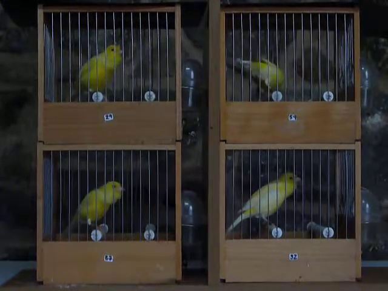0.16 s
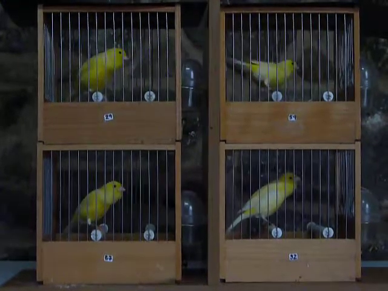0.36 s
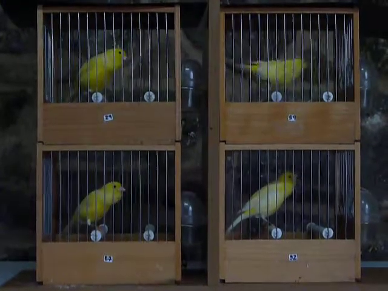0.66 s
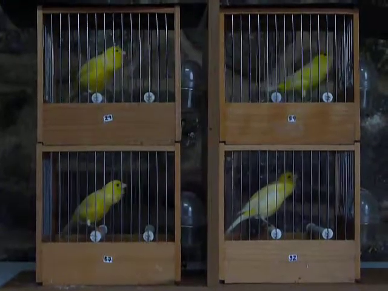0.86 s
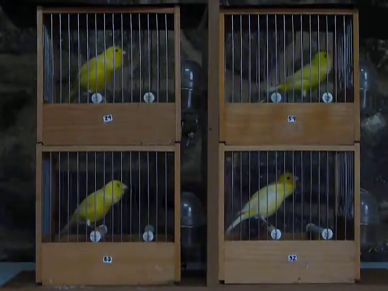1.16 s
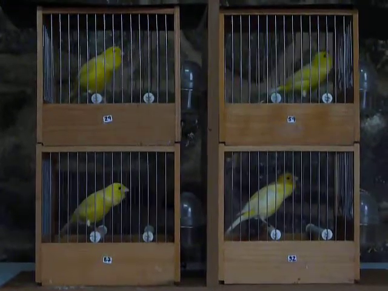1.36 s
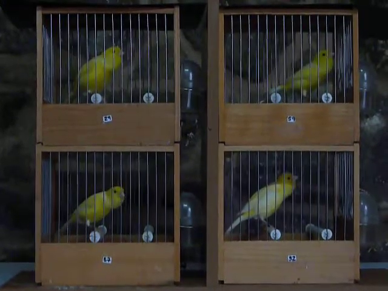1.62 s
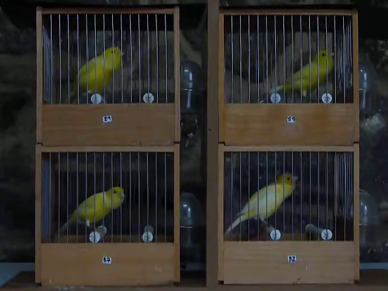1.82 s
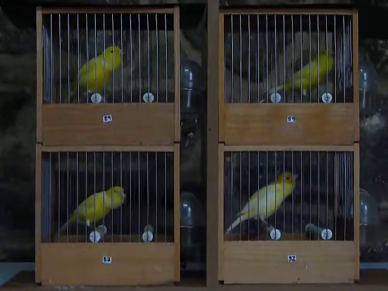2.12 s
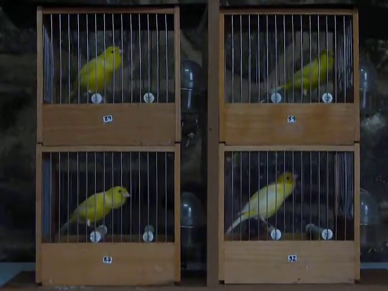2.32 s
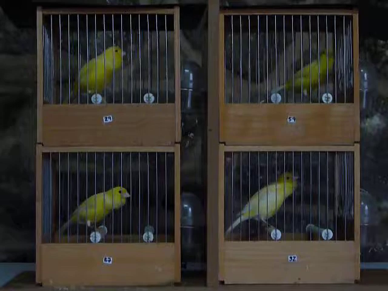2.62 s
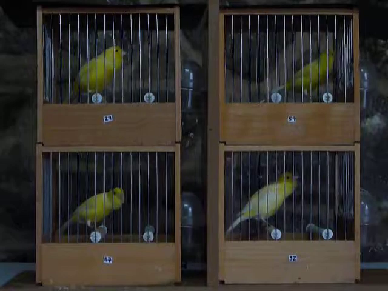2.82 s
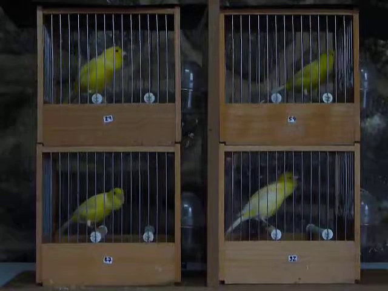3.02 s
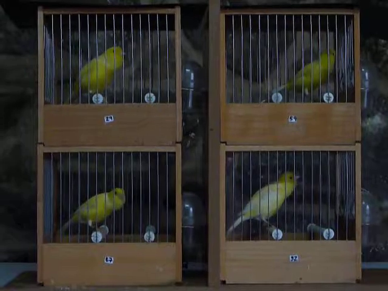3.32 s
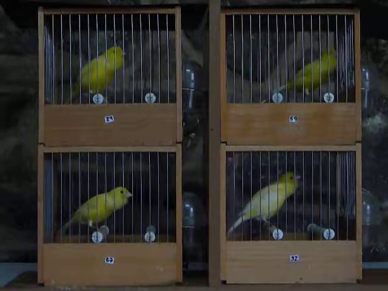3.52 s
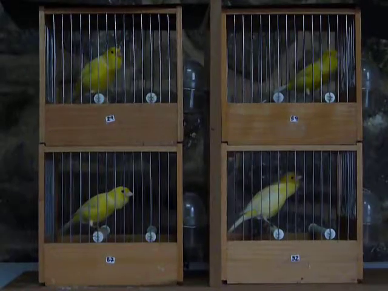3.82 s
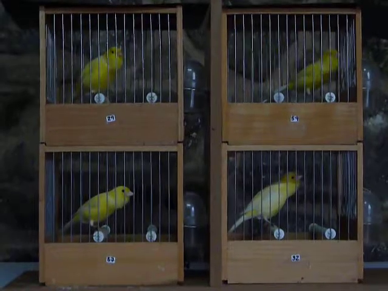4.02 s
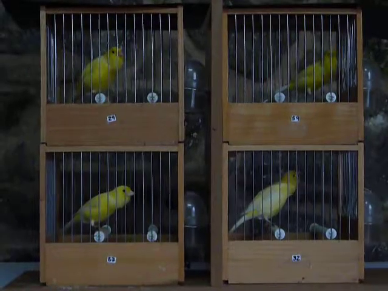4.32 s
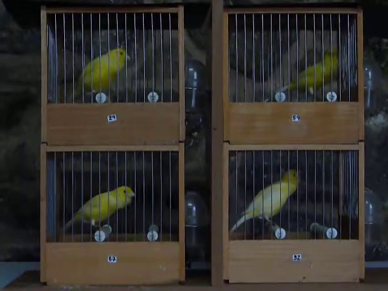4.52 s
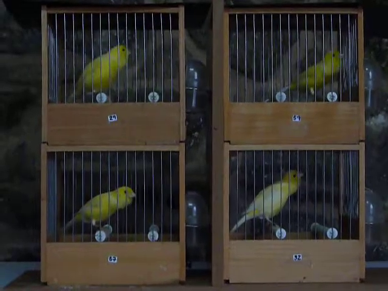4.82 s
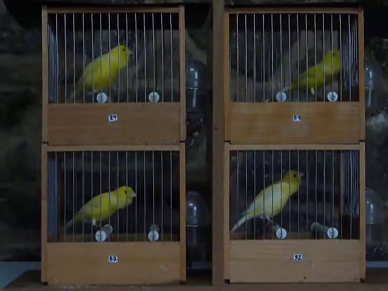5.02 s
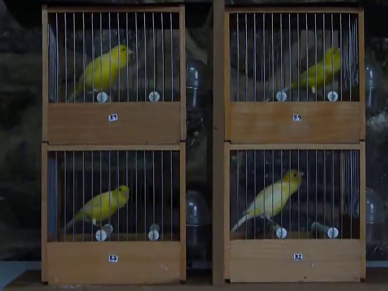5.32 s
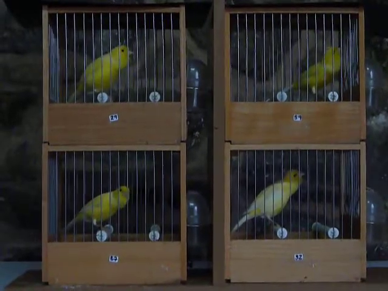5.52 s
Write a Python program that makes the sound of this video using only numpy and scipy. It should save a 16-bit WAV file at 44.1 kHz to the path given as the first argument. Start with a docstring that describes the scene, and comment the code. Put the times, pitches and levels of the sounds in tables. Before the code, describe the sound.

Caged canaries overlap in a hard-walled room, moving from nasal whines and throaty scoops through hollow rolling hoots to a loud rattling, buzzing trill.

```python
"""A small, hard-walled bird room: canaries sing against each other from wooden show cages.
Near and far, a syrinx model sings reedy arches, rising glucks, a hollow roll, a light trill and three loud peeps
as gliding harmonics with breath noise; then a dry rattle of ticks and a low buzzing roll of puffs take over.
Scattered, ringing reflections blur every note on its way to the microphone, over a faint still room."""
import sys
import numpy as np
from scipy import signal
from scipy.fft import rfft, irfft
from scipy.io import wavfile

SR = 44100
rng = np.random.default_rng(int(sys.argv[2]) if len(sys.argv) > 2 else 0)


def log_audio(samples):
    """Write samples as a 16-bit WAV file to the path given in sys.argv[1]."""
    # one column per channel
    frames = np.atleast_2d(samples).T
    # limit to full scale, then quantise
    limited = np.clip(frames, -1, 1)
    pcm = np.round(limited * 32767).astype(np.int16)
    wavfile.write(sys.argv[1], SR, pcm)


N = 250047
T = np.arange(N) / SR

# rattle syllables, two ticks each: t/s, level/dB
RATTLE_SYLLABLES = [(3.711, -24), (3.7653, -24), (3.8214, -22), (3.8703, -21), (3.9209, -20), (3.974, -20),
                    (4.0261, -20.5), (4.0758, -19), (4.1304, -18), (4.181, -21), (4.2303, -17.5),
                    (4.2815, -19.5), (4.332, -17), (4.381, -19), (4.4353, -19), (4.4844, -18.5),
                    (4.5369, -15), (4.589, -17), (4.639, -16.5), (4.693, -17), (4.743, -18.5), (4.796, -17),
                    (4.846, -16), (4.898, -19.5), (4.951, -16), (5.003, -15.5), (5.053, -16),
                    (5.107, -15.5), (5.16, -15), (5.211, -16.5), (5.261, -16), (5.316, -16), (5.37, -15),
                    (5.4252, -18), (5.477, -16.5), (5.529, -17), (5.581, -14), (5.633, -24)]
# syllables of the low buzzing roll: t/s, level/dB
BUZZ_SYLLABLES = [(4.528, -28.5), (4.579, -25), (4.63, -31), (4.677, -25.5), (4.725, -24.5), (4.773, -22.5),
                  (4.825, -23.5), (4.869, -22.5), (4.919, -21), (4.968, -24.5), (5.019, -22),
                  (5.066, -23.5), (5.118, -24.5), (5.166, -24.5), (5.218, -24), (5.266, -20),
                  (5.316, -25.5), (5.371, -30), (5.419, -23), (5.474, -24), (5.518, -25.5), (5.546, -25.5),
                  (5.588, -28), (5.64, -22.5)]
# shifting resonances of the buzz: centre f/Hz, swing/share of f, ring length/s, level/dB
BUZZ_RESONANCES = [(1400, 0.15, 0.0041, 2.5), (2995, 0.054, 0.0046, 7)]
# loud peeps: t/s, length/s, start f/Hz, middle f/Hz, end f/Hz, level/dB
PEEP_NOTES = [(2.353, 0.054, 2948, 3212, 3350, -12), (2.736, 0.046, 2940, 3197, 3300, -13),
              (3.183, 0.044, 3044, 3300, 3160, -13)]
# rising glucks: t/s, top f/Hz, level/dB
GLUCK_NOTES = [(-.115, 1620, -21.5), (0.076, 1632, -23), (0.261, 1623, -23.5), (.45, 1617, -25.5),
               (.642, 1671, -27), (.828, 1598, -25.5), (1.019, 1598, -24), (1.257, 1556, -25),
               (1.504, 1592, -29.5), (1.744, 1531, -28), (1.997, 1490, -31), (2.228, 1571, -27.5),
               (4.862, 1400, -31), (4.98, 1564, -35.5), (5.109, 1548, -34.5), (5.21, 1640, -34.5),
               (5.34, 1583, -29.5), (5.431, 1480, -31.5), (5.543, 1588, -30.5)]
# hoots of the hollow roll: t/s, f/Hz, level/dB, octave overtone level/dB
HOOT_NOTES = [(2.188, 1115, -29, 0), (2.289, 1158, -25, -3.5), (2.412, 1110, -37.5, -8),
              (2.448, 1076, -32.5, -2), (2.492, 1100, -33, 0), (2.54, 1100, -32, -1),
              (2.589, 1127, -27, -4), (2.641, 1120, -31, -0.5), (2.689, 1140, -30, 4),
              (2.785, 1150, -36, -1), (2.834, 1154, -28, -3.5), (2.884, 1104, -31, -4.5),
              (2.928, 1104, -31, -0.5), (2.987, 1102, -31.5, 0.5), (3.031, 1089, -28.5, -3),
              (3.089, 1113, -29, -4.5), (3.141, 1108, -29, -2), (3.197, 1109, -33.5, 1),
              (3.265, 1099, -33, -3), (3.328, 1099, -32, -4.5), (3.39, 1088, -31, -10),
              (3.463, 1091, -31, -7.5), (3.535, 1107, -28.5, -2), (3.598, 1049, -27.5, -9.5),
              (3.673, 1073, -29, -4), (3.738, 1071, -28.5, -6.5), (3.806, 1095, -27, -7),
              (3.876, 1086, -27, -14), (3.95, 1112, -27.5, -5.5), (4.02, 1068, -29.5, -6.5),
              (4.104, 1056, -27.5, -10), (4.168, 1069, -29, -8.5), (4.245, 1108, -27.5, -10),
              (4.311, 1080, -29, -3.5), (4.39, 1068, -30.5, -4), (4.461, 1095, -28.5, -0.5)]
# hoots swoop at first, then lengthen, level out and gain an undertone:
# t/s, length/s, swoop/share of f, undertone level/dB
HOOT_SHAPES = [(3.15, .04, .13, -42), (3.6, .049, .025, -19)]
# drawn-out reedy notes: t/s, length/s, time to the top/s, top f/Hz, level/dB
WHINE_NOTES = [(-.03, 0.12, 0.096, 1089, -31), (0.158, 0.12, 0.063, 1135, -31.5),
               (.33, 0.16, 0.11, 1131, -32.5), (0.508, 0.15, 0.081, 1136, -32),
               (0.684, 0.15, 0.083, 1140, -32.5), (0.861, .25, 0.095, 1155, -31),
               (1.204, .28, .094, 1164, -30.5), (1.581, 0.26, 0.1, 1161, -29.5),
               (1.964, .28, 0.083, 1175, -30)]
# notes of the light trill: t/s, top f/Hz, level/dB
TRILL_NOTES = [(1.86, 1129, -30.5), (1.97, 1130, -29.5), (2.08, 1142, -33.5), (2.178, 1140, -34),
               (2.281, 1138, -28.5), (2.375, 1163, -40), (2.475, 1161, -35), (2.585, 1157, -31),
               (2.69, 1187, -34), (2.791, 1166, -34), (2.883, 1199, -33), (2.975, 1189, -34),
               (3.065, 1179, -34.5), (3.155, 1179, -36), (3.245, 1196, -36), (3.34, 1197, -37.5),
               (3.441, 1178, -35), (3.555, 1197, -37.5), (3.635, 1188, -37)]
# soft side whistles: t/s, length/s, f/Hz, level/dB
WHISTLE_NOTES = [(2.727, 0.0064, 1858, -27.5), (2.763, 0.078, 1837, -39.5), (3.029, 0.056, 1890, -38.5),
                 (3.155, 0.018, 1680, -39), (3.413, 0.11, 1928, -36)]

# harmonics of each voice, from the fundamental up: level/dB
PEEP_HARMONICS = [0, -45.5]
GLUCK_HARMONICS = [0, -30, -38]
WHINE_HARMONICS = [-7, -3.5, 2.5, -9, -24, -34.5]
TRILL_HARMONICS = [-1, -1.5, 0.5, -15.5, -26.5, -39]

# throat and beak colours of the rattle, the buzz and the breath: f/Hz, level/dB
RATTLE_SPECTRUM = [(40, -38.5), (300, -16.5), (520, -16.5), (720, -4), (1050, 1), (1600, -2), (2200, 1.5),
                   (2600, 0.5), (2950, -2.5), (3350, 1.5), (3620, -15.5), (3950, -13), (4700, -22.5),
                   (6200, -22), (7400, -52.5)]
BUZZ_SPECTRUM = [(40, -41.5), (300, -16), (550, -16.5), (750, -1), (1100, 8.5), (1500, -3), (1900, -2),
                 (2450, 4.5), (2900, 7.5), (3350, 6), (3800, -14), (4800, -20), (6200, -23.5), (7400, -51)]
BREATH_SPECTRUM = [(90, -12), (350, -3.5), (600, 3.5), (850, 5.5), (1250, 15.5), (1900, 3.5), (2700, 2.5),
                   (4200, -4), (5200, -18.5), (6500, -23.5), (7500, -49)]
GLUCK_BREATH_SPECTRUM = [(90, -15.5), (350, -3.5), (600, -5), (850, 8.5), (1250, 15), (1900, 8), (2700, 2),
                         (4200, -4), (5200, -13.5), (6500, -16.5), (7500, -37)]
# the still room: f/Hz, level/dB
STILL_SPECTRUM = [(25, -46), (45, -25.5), (75, -5.5), (105, -5), (130, 3), (155, 0), (280, 0), (500, 1.5),
                  (1000, 6), (2200, 5), (4000, 0.5), (5500, -11), (6800, -23), (7600, -35)]

TICK_GAP_S, TICK_S, TICK_FROM_HZ, TICK_TO_HZ, TICK_DB = .0257, .0068, 3520, 2650, 2.5
BUZZ_PULSES_PER_S, BUZZ_FADE_DB_PER_S, BUZZ_SHIFTS_PER_S = 122, 290, 14
# each whine climbs by the scoop to its top, then sags as long as it lasts
WHINE_SCOOP_HZ, WHINE_SAG_HZ_PER_S = 149.8, 620
# the fundamental gains this many dB for each dB sung below full
WHINE_FULL_DB, WHINE_MELLOWING = -26.5, 0.92
WHINE_WAVER = 0.0057  # slow unsteadiness, as a share of the pitch
FLUTTER_DB = 1.8  # pressure unsteadiness shared by whines, peeps and whistles
ROOM_T60_S = .58
STILL_DB, TOP_HZ = -42.5, 7450


def undb(db):
    """Decibels to gain."""
    return 10 ** (np.asarray(db) / 20)


def unit(x):
    """Scale to rms 1."""
    return x / np.sqrt(np.mean(x ** 2))


def add(track, start, sound):
    """Mix a sound into a track at a time in seconds, trimmed to the track."""
    i = int(round(start * SR))
    lo, hi = max(i, 0), min(i + len(sound), N)
    if hi > lo:
        track[lo:hi] += sound[lo - i:hi - i]


def wander(n, rate):
    """Random motion: straight lines between Gaussian points, `rate` of them a second."""
    points = rng.standard_normal(4096)
    return np.interp(np.arange(n) / SR * rate, np.arange(len(points)), points)


def colour(x, points, size=2048):
    """Causal minimum-phase filter through (Hz, dB) points, with unit energy."""
    hz, db = np.transpose(points)
    grid = np.maximum(np.arange(size // 2 + 1) * SR / size, 1)
    gain = undb(np.interp(np.log(grid), np.log(hz), db))
    cepstrum = irfft(np.log(gain))
    # folding the cepstrum onto positive time makes the filter causal
    cepstrum[1:size // 2] *= 2
    cepstrum[size // 2 + 1:] = 0
    response = irfft(np.exp(rfft(cepstrum)))
    return signal.fftconvolve(x, response / np.linalg.norm(response))[:len(x)]


def pip(from_hz, to_hz, length):
    """A short gliding tone that swells and dies at once."""
    hz = np.linspace(from_hz, to_hz, int(length * SR))
    return np.hanning(len(hz)) * np.sin(2 * np.pi * np.cumsum(hz) / SR)


def note(length, start_hz, middle_hz, end_hz, partials, turn, attack, release, jitter, flutter_db,
         undertone_db=-60, boost_db=0, bend=1, waver=0):
    """One syrinx note: pitch glides through three points as air pressure swells and drops. Returns both."""
    u = np.linspace(0, 1, int(length * SR))  # turn, attack and release are shares of the note
    turn = np.clip(turn, .05, .95)
    # a bend above 1 makes both pitch and pressure creep in before they climb
    climb = np.sin(np.pi / 2 * np.minimum(u / turn, 1)) ** bend
    before = start_hz + (middle_hz - start_hz) * climb
    after = middle_hz + (end_hz - middle_hz) * (1 - np.cos(np.pi / 2 * (u - turn) / (1 - turn)))
    unsteadiness = 1 + jitter * wander(len(u), 346.7) + waver * wander(len(u), 60)
    hz = np.where(u < turn, before, after) * unsteadiness
    phase = 2 * np.pi * np.cumsum(hz) / SR

    swell = np.sin(np.pi / 2 * np.minimum(u / attack, 1))
    drop = np.sin(np.pi / 2 * np.minimum((1 - u) / release, 1))
    flutter = undb(flutter_db * wander(len(u), 200))
    pressure = swell * drop * (hz / middle_hz) ** bend * flutter

    tone = undb(undertone_db) * np.sin(phase / 2)  # alternate cycles differ a little
    for k, db in enumerate(partials, 1):
        tone = tone + undb(db + boost_db * (k == 1)) * np.sin(k * phase)
    return np.sqrt(2) * tone * pressure, pressure


def sing(notes, rasp_db, chiff_db=-60, chiff_s=.04, air_colour=BREATH_SPECTRUM):
    """Lay out (s, dB, note) rows; a puff of air starts each note and breath rasps on with its pressure."""
    tones, air = np.zeros(N), np.zeros(N)
    for start, db, (tone, pressure) in notes:
        add(tones, start, undb(db) * tone)
        add(air, start, undb(db + rasp_db) * pressure)
        add(air, start - chiff_s / 2, undb(db + chiff_db) * np.hanning(int(chiff_s * SR)))
    return tones + air * colour(rng.standard_normal(N), air_colour)


def rattle(rasp_db=-10.5, rasp_scale_s=0.0064, second_db=-3, spread=0.032):
    """Falling ticks, about 39 a second; a grainy rasp swells behind every other one and fades."""
    ticks, air = np.zeros(N), np.zeros(N)
    age = T[:SR // 10] / rasp_scale_s
    rasp = np.sqrt(age) * np.exp((1 - age) / 3)  # peaks at 1.5 time scales
    for start, db in RATTLE_SYLLABLES:
        add(air, start - rasp_scale_s / 2, undb(db + rasp_db) * rasp)
        for k, pitch in enumerate(1 + spread * rng.standard_normal(2)):
            tick = pip(pitch * TICK_FROM_HZ, pitch * TICK_TO_HZ, TICK_S)
            tick_db = db + TICK_DB + k * second_db
            add(ticks, start + k * TICK_GAP_S - TICK_S / 4, undb(tick_db) * tick)
    grains = unit(rng.standard_normal(N) * undb(2.45 * wander(N, 600)))
    return ticks + colour(grains * air, RATTLE_SPECTRUM)


def buzz(jitter=.12, scatter_db=3, puff_db=4, fall=0.088, count=5, puff_samples=176):
    """About twenty syllables a second: fading puffs through a wide throat ring two shifting resonances."""
    puffs, rings = np.zeros(N), np.zeros(N)
    shifts = [wander(N, BUZZ_SHIFTS_PER_S) for _ in BUZZ_RESONANCES]
    for start, db in BUZZ_SYLLABLES:
        gaps, louder = rng.standard_normal((count, 2)).T
        ages = (np.arange(count) + jitter * gaps) / BUZZ_PULSES_PER_S
        gains = undb(db - BUZZ_FADE_DB_PER_S * ages + scatter_db * louder)
        for s, gain in zip(start + ages, gains):
            puff = np.hanning(puff_samples) * rng.standard_normal(puff_samples)
            add(puffs, s, gain * puff)
            for (hz, swing, length, ring_db), shift in zip(BUZZ_RESONANCES, shifts):
                centre = hz * (1 + swing * np.interp(s, T, shift))
                ring = pip(centre * (1 + fall), centre * (1 - fall), length)
                add(rings, s, gain * undb(ring_db) * ring)
    return undb(puff_db) * colour(puffs, BUZZ_SPECTRUM) + rings


def peeps():
    """Nearly pure calls: pitch climbs quickly, then the first two keep rising and the last falls back."""
    shape = dict(turn=.65, attack=.3, release=.7, jitter=.006, flutter_db=FLUTTER_DB)
    notes = []
    for s, length, start_hz, middle_hz, end_hz, db in PEEP_NOTES:
        notes.append((s, db, note(length, start_hz, middle_hz, end_hz, PEEP_HARMONICS, **shape)))
    return sing(notes, rasp_db=-41.5, chiff_db=-13.5, chiff_s=0.017)


def glucks():
    """Rough scoops that start low and faint and grow as pitch and pressure climb; faint again near the end."""
    shape = dict(turn=.7, attack=.52, release=.17, jitter=.022, bend=2.0, flutter_db=1.0, undertone_db=-40.5)
    notes = []
    for s, hz, db in GLUCK_NOTES:
        notes.append((s, db, note(.116, 0.35 * hz, hz, 0.76 * hz, GLUCK_HARMONICS, **shape)))
    return sing(notes, rasp_db=-7, air_colour=GLUCK_BREATH_SPECTRUM)


def roll():
    """Hollow hoots: quick swooping pulses of syrinx tone that slow into cleaner, more level ones."""
    shape = dict(turn=.5, attack=.5, release=.5, jitter=.012, flutter_db=1.5)
    times, *style = np.transpose(HOOT_SHAPES)
    notes = []
    for s, hz, db, octave_db in HOOT_NOTES:
        length, swoop, under = (np.interp(s, times, column) for column in style)
        low = hz * (1 - swoop)
        partials = [0, octave_db, -26, -34]
        notes.append((s, db, note(length, low, hz, low, partials, undertone_db=under, **shape)))
    return sing(notes, rasp_db=-18)


def whines():
    """Long reedy arches; the throat favours the third partial, and softer notes are mellower."""
    shape = dict(bend=.7, attack=0.2, release=.05, undertone_db=-19,
                 jitter=0.0087, flutter_db=FLUTTER_DB, waver=WHINE_WAVER)
    notes = []
    for s, length, top_s, hz, db in WHINE_NOTES:
        start_hz = hz - WHINE_SCOOP_HZ
        end_hz = hz - WHINE_SAG_HZ_PER_S * (length - top_s)
        boost_db = WHINE_MELLOWING * (WHINE_FULL_DB - db)
        sung = note(length, start_hz, hz, end_hz, WHINE_HARMONICS,
                    turn=top_s / length, boost_db=boost_db, **shape)
        notes.append((s, db, sung))
    return sing(notes, rasp_db=-3.5, chiff_db=-1.5, chiff_s=.08)


def trill():
    """Gently arched reedy notes, about ten a second, in a light warble."""
    shape = dict(turn=.55, attack=.4, release=.3, jitter=.006, flutter_db=3)
    notes = []
    for s, hz, db in TRILL_NOTES:
        notes.append((s, db, note(0.0715, .92 * hz, hz, .975 * hz, TRILL_HARMONICS, **shape)))
    return sing(notes, rasp_db=-13.0)


def whistles():
    """Soft whistles from further back: nearly pure tones with no arch in pitch."""
    shape = dict(turn=.5, attack=.26, release=.24, jitter=.007, flutter_db=FLUTTER_DB)
    notes = []
    for s, length, hz, db in WHISTLE_NOTES:
        notes.append((s, db, note(length, hz, hz, hz, PEEP_HARMONICS, **shape)))
    return sing(notes, rasp_db=-22.0)


def room(x, early_db, late_db, early_t60=0.19, gap_s=0.0013):
    """Direct sound, quick scatter from cages and near walls, and the room's longer ring, at unchanged power."""
    t = T[:SR]
    response = np.zeros(len(t))
    response[0] = 1
    for db, t60 in ((early_db, early_t60), (late_db, ROOM_T60_S)):
        decay = np.exp(-np.log(1000) * t / t60)
        tail = rng.standard_normal(len(t)) * decay * (t > gap_s)
        response += undb(db) * tail / np.linalg.norm(tail)  # level against the direct sound
    return np.std(x) * unit(signal.fftconvolve(x, response)[:N])


def still_room():
    """The quiet bed behind the birds: steady noise with a fixed spectrum."""
    return undb(STILL_DB) * unit(colour(rng.standard_normal(N), STILL_SPECTRUM, size=8192))


def scene():
    """Each voice reaches the microphone by its own paths; more late ring sounds further off."""
    song = room(rattle(), early_db=0, late_db=-1.5)
    song += room(buzz(), early_db=-5, late_db=-2)
    song += room(peeps(), early_db=-7, late_db=-1)
    song += room(glucks(), early_db=-1.5, late_db=-1.5)
    song += room(roll(), early_db=-5, late_db=-6)
    song += room(whines(), early_db=-4, late_db=2)
    song += room(trill(), early_db=-5.5, late_db=5.5)
    song += room(whistles(), early_db=-8.0, late_db=6.5)
    return (song + still_room())[None]


def record(dry):
    """The recorder behind the microphone cuts the top steeply: an elliptic low-pass."""
    return signal.sosfilt(signal.ellip(10, .2, 80, TOP_HZ, fs=SR, output="sos"), dry)


dry = scene()
out = record(dry)
log_audio(out)
```